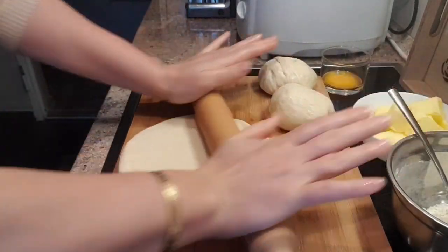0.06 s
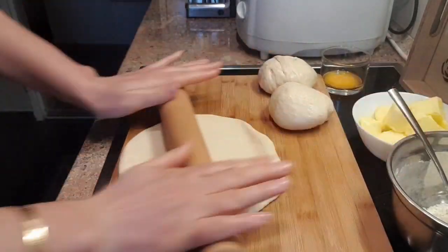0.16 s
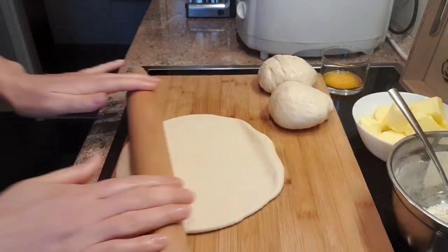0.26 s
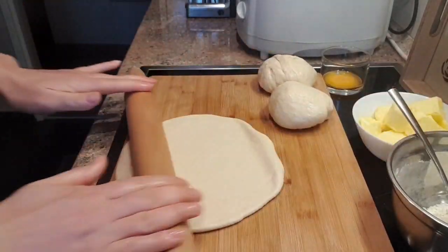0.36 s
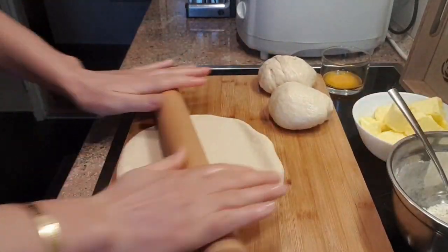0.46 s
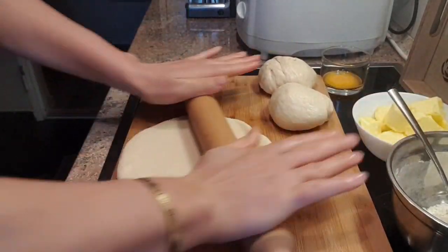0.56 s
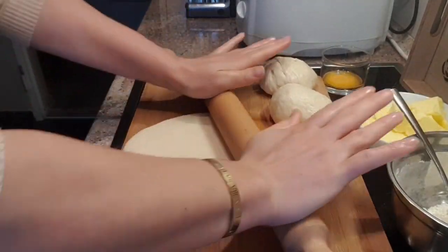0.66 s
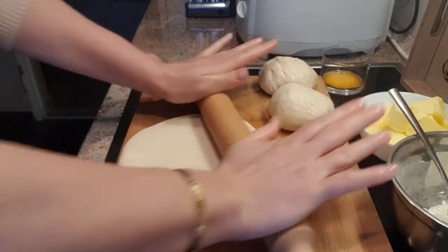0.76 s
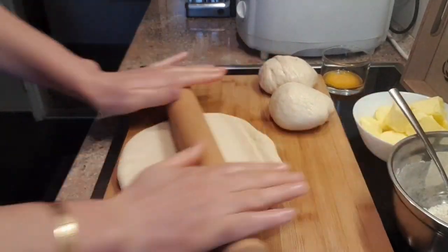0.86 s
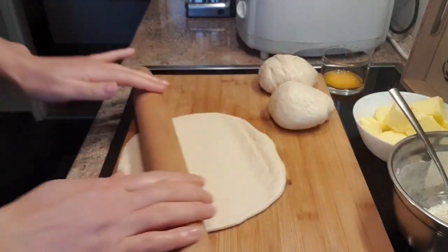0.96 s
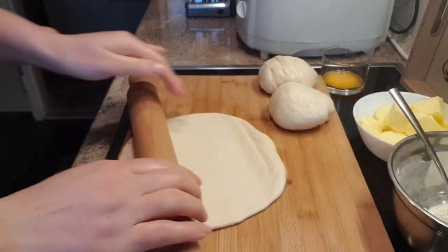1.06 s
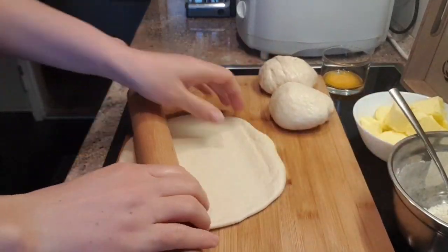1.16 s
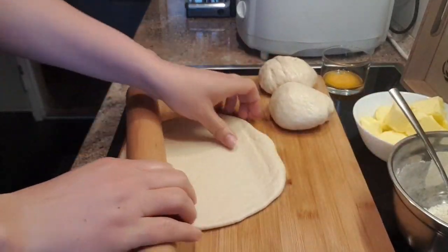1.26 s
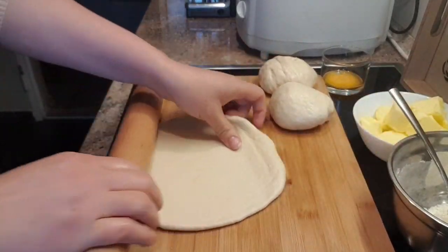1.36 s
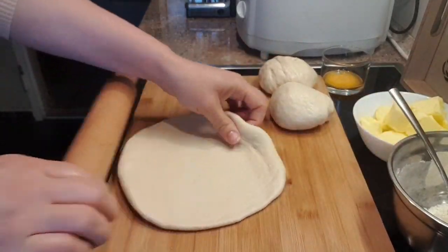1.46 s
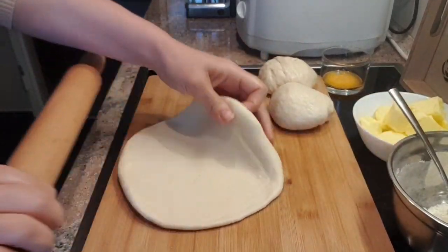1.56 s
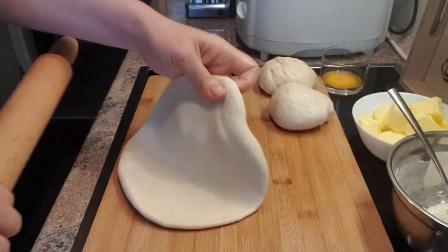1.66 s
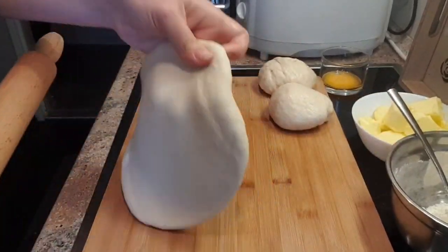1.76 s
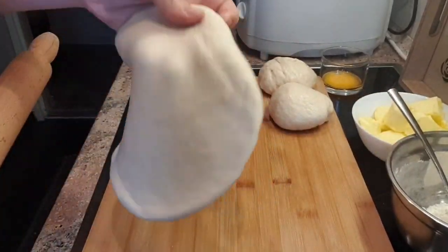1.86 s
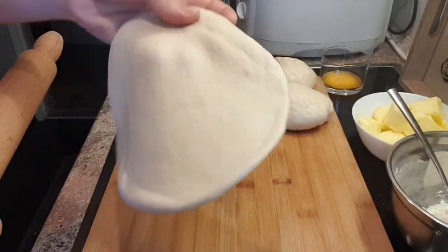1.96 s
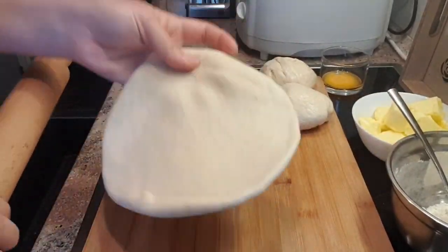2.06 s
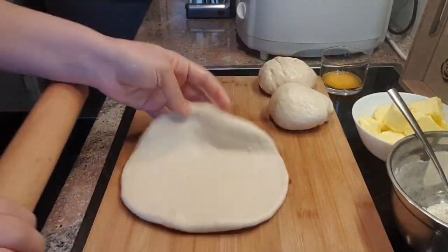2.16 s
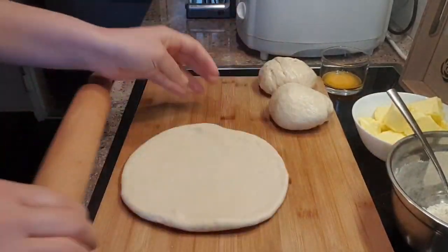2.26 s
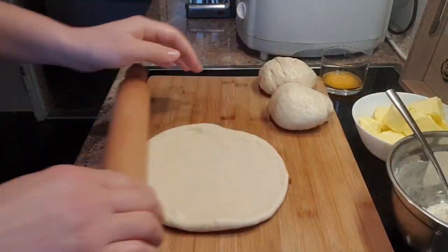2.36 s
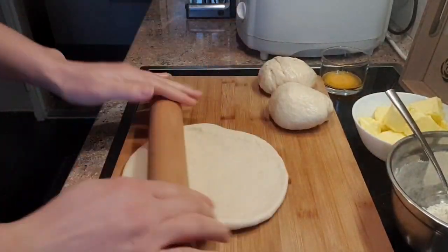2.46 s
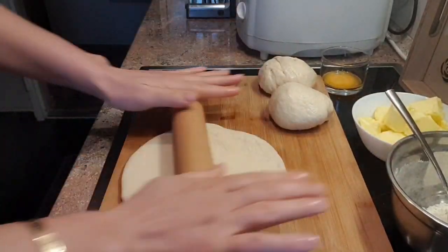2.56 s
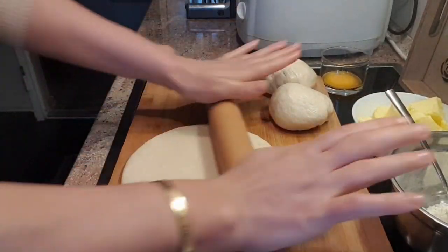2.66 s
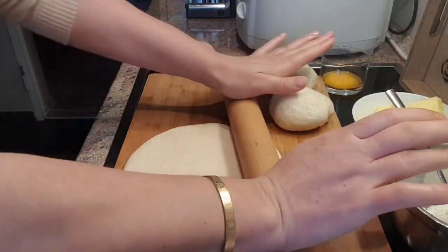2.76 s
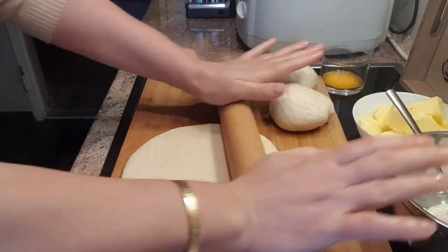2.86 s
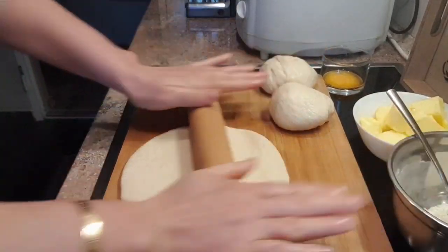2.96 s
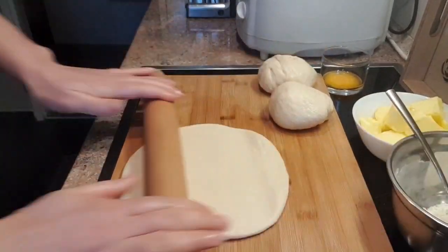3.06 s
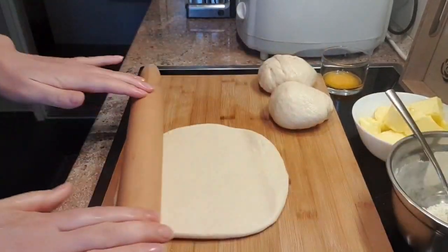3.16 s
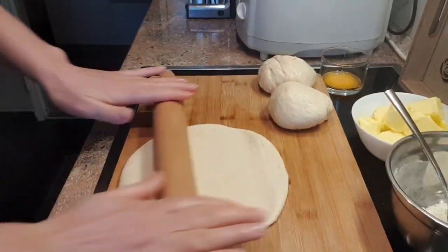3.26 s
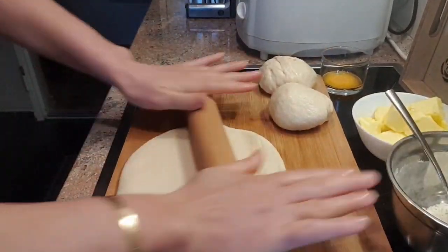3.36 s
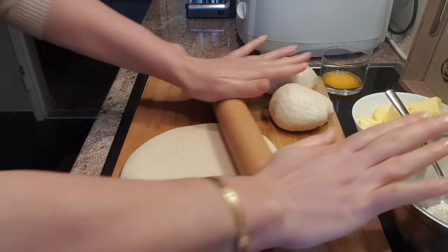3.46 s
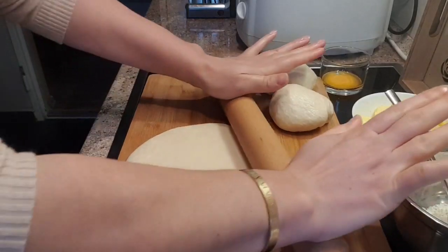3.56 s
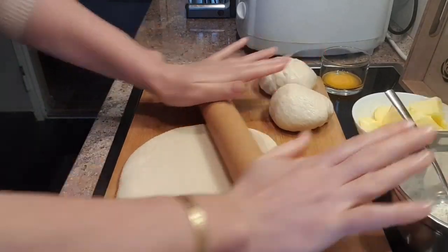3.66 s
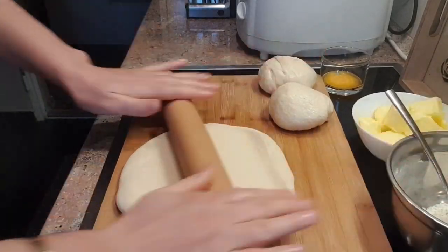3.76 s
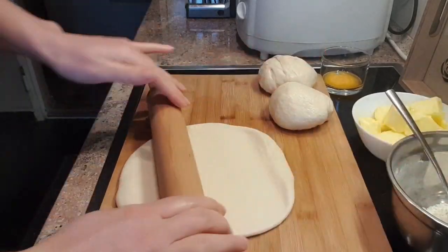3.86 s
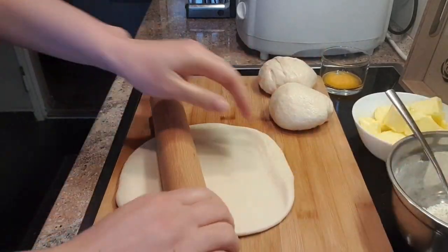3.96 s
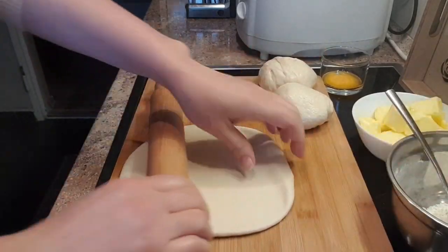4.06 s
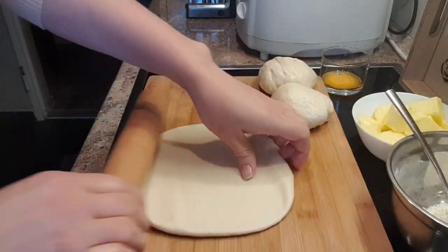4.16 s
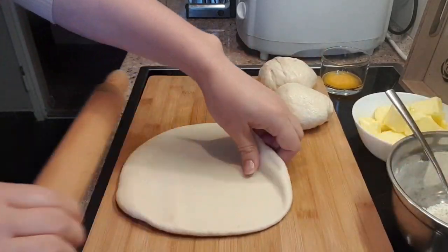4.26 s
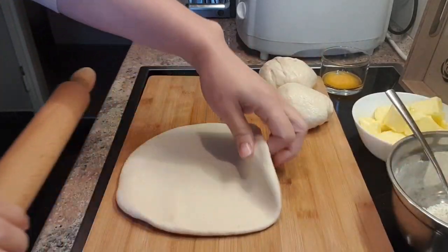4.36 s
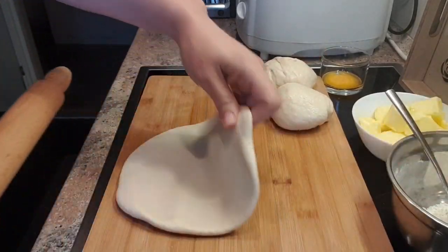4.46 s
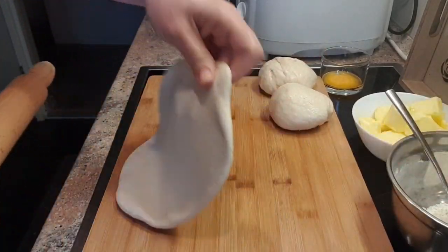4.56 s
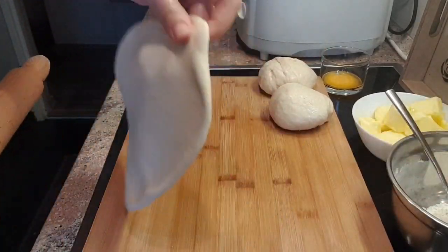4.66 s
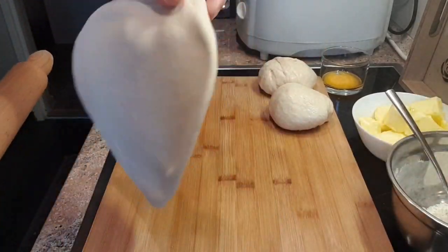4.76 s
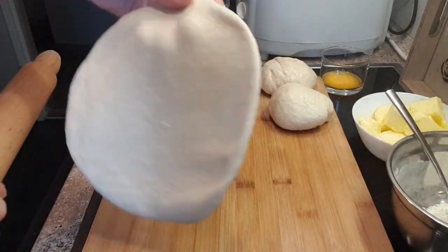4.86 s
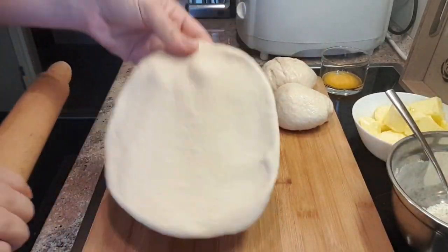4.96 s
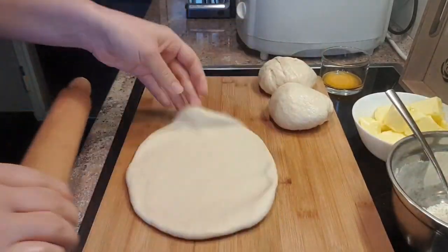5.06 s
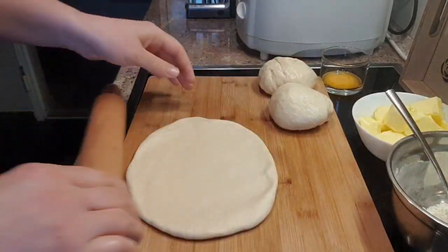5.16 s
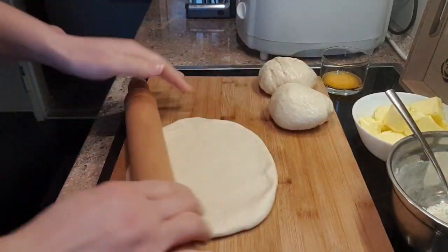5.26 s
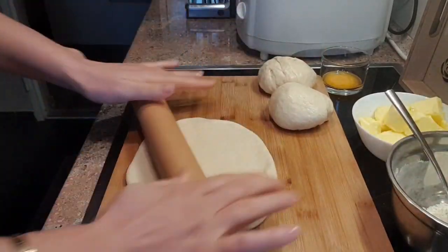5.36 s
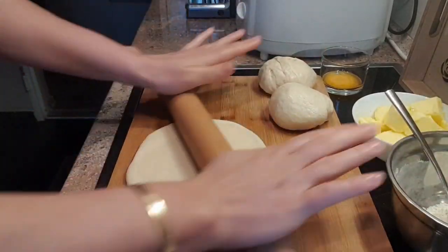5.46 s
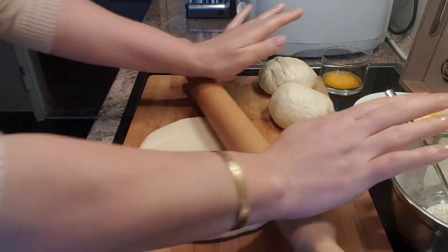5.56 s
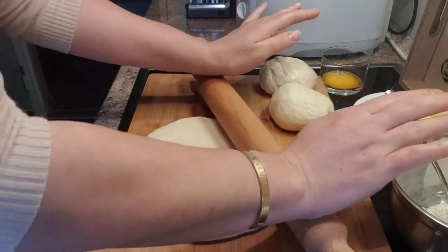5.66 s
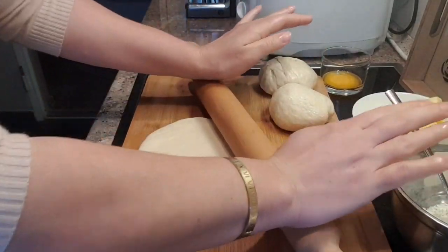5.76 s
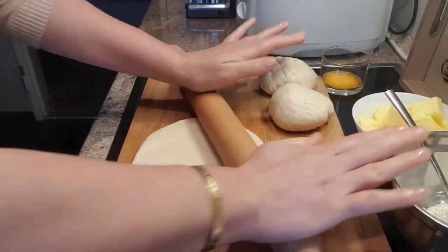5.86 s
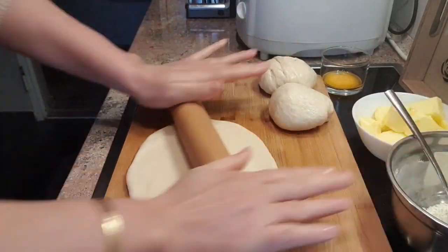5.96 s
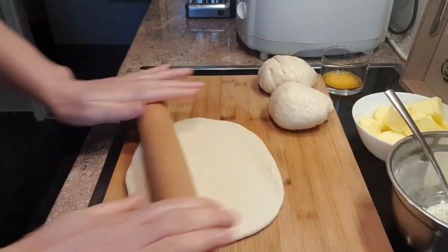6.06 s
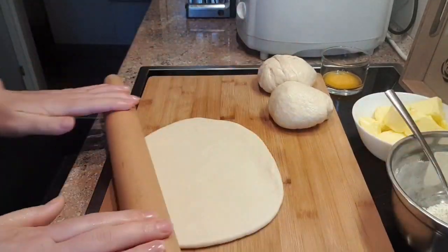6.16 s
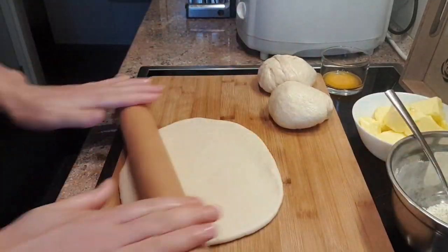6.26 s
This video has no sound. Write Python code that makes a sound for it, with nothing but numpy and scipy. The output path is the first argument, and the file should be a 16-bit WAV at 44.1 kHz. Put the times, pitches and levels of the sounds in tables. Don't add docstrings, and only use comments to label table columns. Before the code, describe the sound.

Close kitchen dough rolling: low rumbling strokes and floury swishes, one flat slap, a faint peel, a hard wooden drop with bounces, rolling again.

```python
import sys
import numpy as np
from scipy import signal
from scipy.fft import rfft, irfft
from scipy.io import wavfile
from scipy.ndimage import uniform_filter1d

SR = 44100
rng = np.random.default_rng(int(sys.argv[2]) if len(sys.argv) > 2 else 0)


def amplitude_ratio(level_db):
    exponent = np.asarray(level_db, float) / 20
    return 10 ** exponent


def to_wav(sig):
    pcm = np.clip(np.atleast_2d(sig), -1, 1) * 32767
    pcm = np.round(pcm).astype(np.int16)
    wavfile.write(sys.argv[1], SR, pcm.T)


N = 277389

# pitch_hz, t60_s
COUNTER = [(53, 0.53), (79, 0.3), (100, 0.09)]
# pitch_hz, likeness_0_to_1
SAME = [(60, 0.94), (250, 0.68), (600, 0.57), (1500, 0.083), (4000, 0.067), (12000, 0.073)]


def evened(x):
    return x / np.sqrt(np.mean(x ** 2) + 1e-20)


def read(points, hz):
    f, value = np.transpose(points)
    return np.interp(np.log(hz + 1), np.log(f + 1), value)


def add(mix, start_s, sound):
    part = mix[..., round(start_s * SR):][..., :sound.shape[-1]]
    part += sound[..., :part.shape[-1]]


def ring(hz, db, t60_s, rise_s):
    t = np.arange(SR // 2) / SR
    swell = (1 - np.exp(-t / rise_s)) ** 2
    return amplitude_ratio(db - 60 * t / t60_s) * swell * np.sin(2 * np.pi * hz * t)


def resonate(x, hz, width_hz):
    return signal.lfilter(*signal.iirpeak(hz, hz / width_hz, SR), x)


def causal(db):
    log_gain = np.log(amplitude_ratio(np.maximum(db, -90)))
    full = np.concatenate([log_gain, log_gain[-2:0:-1]])
    return np.fft.ifft(np.exp(np.conj(signal.hilbert(full)))).real


def swells(rows, end_db, blunt):
    t, power = np.arange(N) / SR, 0
    for peak_s, rise_s, fall_s, *db in rows:
        away = np.where(t < peak_s, (peak_s - t) / rise_s, (t - peak_s) / fall_s)
        level_db = np.array(db)[:, None] + end_db * np.minimum(away, 4) ** blunt
        power = power + amplitude_ratio(level_db) ** 2
    return np.sqrt(power)


def noise(shape, patchy_db, flicker_db, size=512):
    frames, hz = 4 * N // size + 5, np.fft.rfftfreq(size, 1 / SR)
    a, b, c, d, patches = rng.standard_normal((frames, len(hz), 5)).T
    flicker = evened(uniform_filter1d(rng.standard_normal(frames), size=3))
    patches = uniform_filter1d(patches, size=8, axis=0)
    patches = evened(uniform_filter1d(patches, size=16, axis=1))
    same = np.clip(read(SAME, hz), -1, 1)[:, None]
    left = a + 1j * b
    right = same * left + np.sqrt(1 - same ** 2) * (c + 1j * d)
    level_db = read(shape, hz)[:, None] + patchy_db * patches + flicker_db * flicker
    z = np.array([left, right]) * amplitude_ratio(level_db)
    return evened(signal.istft(z, nperseg=size, noverlap=3 * size // 4)[1][:, :N])


def still_air():
    # pitch_hz, level_db_per_hz
    murmur = [(15, -39), (25, -17.5), (60, -2.5), (96, 3), (161, 1.5), (256, -7), (335, -4.5), (439, -15.5),
              (1160, -19), (1440, -26.5), (2050, -25), (6050, -37.5), (7310, -41), (8830, -38),
              (14800, -34), (16000, -41)]
    # peak_s, rise_s, fall_s, share_taken_away_db
    lull = [
        (5.06, 0.37, 0.14, -13),
    ]
    # pitch_hz, level_db
    whine_hz, whine_db = (7250, -92.5)
    whine = amplitude_ratio(whine_db) * evened(resonate(rng.standard_normal((2, N)), whine_hz, 70))
    left_over = 1 - np.minimum(swells(lull, -5.5, 1.8), 0.8)
    return amplitude_ratio(-61) * left_over * noise(murmur, 0.44, 0.93, size=2048) + whine


def drone():
    # peak_s, rise_s, fall_s, level_db
    passing = [
        (2.2, 0.3, 0.24, -55),
    ]
    hz, width_hz = 63.9, 13
    hum = resonate(resonate(rng.standard_normal(N), hz, width_hz), hz, width_hz)
    return swells(passing, -16, 3.1)[0] * evened(hum)


def kitchen(x):
    # pitch_hz, t60_s
    decay = [(150, 0.69), (350, 0.26), (700, 0.39), (1500, 0.35), (4000, 0.33), (12000, 0.25)]
    taps = np.zeros((2, SR))
    at = np.arange(200, SR - 20, 20) + rng.integers(0, 20, (2, (SR - 201) // 20))
    np.put_along_axis(taps, at, rng.choice([-1., 1.], at.shape), 1)
    hz, t, z = signal.stft(taps, SR, nperseg=512)
    same = np.clip(read(SAME, hz), -1, 1)[:, None]
    z[1] = same * z[0] + np.sqrt(1 - same ** 2) * z[1]
    tail = signal.istft(z * amplitude_ratio(-60 * t / read(decay, hz)[:, None]), SR, nperseg=512)[1]
    return signal.fftconvolve(x[None], tail / np.linalg.norm(tail[0]), axes=1)[:, :N]


def counter():
    # start_s, level_db, spot (0 rings the low mode, 1 the middle, 2 the upper)
    lumps = [(0.009, -39.5, 1.57), (0.156, -32.5, 2.63), (0.185, -46.5, 1), (0.278, -36, 1.72),
             (0.334, -41, 0.44), (0.369, -52, 0.46), (0.415, -52, 1), (0.548, -46, 0.99),
             (0.612, -36.5, 1.22), (0.641, -55, 1), (0.67, -43, 1), (0.728, -46.5, 1), (0.775, -47.5, 1.2),
             (0.824, -54.5, 1), (0.978, -35, 1.48), (1.015, -42, 0.33), (1.059, -34.5, 1.9),
             (1.093, -49, 1), (1.353, -40, 0.99), (1.506, -53, 0.99), (1.72, -56, 1.6), (1.767, -41, 2.1),
             (3.155, -39.5, 0.48), (3.2, -47.5, 1), (3.413, -43.5, 1.03), (3.877, -37.5, 0.74),
             (3.928, -60, 0.9), (4.189, -51, 1.7), (4.302, -46, 1.35), (4.391, -52, 2), (4.849, -58.5, 1.9),
             (5.901, -30, 2.5), (6.188, -42.5, 1.2)]
    # start_s, low_mode_db, middle_mode_db, upper_mode_db
    jolts = [
        (5.193, -42.5, -60, -27),
        (5.237, -52.5, -46, -36),
        (5.399, -46.5, -56, -37.5),
        (5.6, -66, -57, -46.5),
        (2.95, -69, -56, -33),
    ]
    spot_db = -13
    arm_damp = 0.49
    shoves = [(s, 1, db) for s, *db in jolts]
    for s, db, spot in lumps:
        shoves.append((s, arm_damp, db + spot_db * abs(spot - np.arange(len(COUNTER)))))
    out = np.zeros(N)
    for s, share, mode_db in shoves:
        for (hz, t60_s), db in zip(COUNTER, mode_db):
            add(out, s, ring(hz, db + 8.5, share * t60_s, 0.0043))
    return out


def bodies():
    # pitch_hz, level_db, t60_s, starting_way
    UNDER_PRESS = [(54.2, -14, .22, 1), (76, -5.3, .13, 1), (97.5, -9.5, .089, 1), (140, -18, .048, 1)]
    UNDER_LEAN = [(54, -24, .31, 1), (79, -18, .23, 1), (100, -18, .082, 1), (133, -22, .06, 1)]
    UNDER_SLAP = [(52, -23, .29, 1), (80, -15, .135, 1), (101, -31, .24, 1), (218, -18, .052, 1),
                  (285, -19, .074, -1)]
    UNDER_EDGE = [(56, -42, .3, 1), (80, -27, .27, 1), (114, -16.5, .039, -1), (181, -41, .14, 1),
                  (221, -24.5, .115, 1), (337, -12, .017, -1)]
    UNDER_BANG = [(82, -23, .25, 1), (99, -21, .25, 1), (171, -30, .2, 1), (231, -14, .053, 1),
                  (290, -21, .2, -1), (368, -34, .2, -1), (631, -33, .03, 1), (740, -31, .08, 1),
                  (824, -29, .04, 1), (949, -30, .065, -1), (1057, -24, .037, 1), (205, -31, .1, 1)]
    UNDER_DROP = [(106, -28, .046, -1), (380, -42, .2, -1), (739, -22, .062, -1), (857, -12, .024, -1),
                  (927, -26, .07, 1), (1013, -17, .035, 1), (1516, -28, .024, 1), (1606, -43, .1, 1)]
    # pitch_hz, level_db, t60_s, starting_way
    SLAP_RING = [(441, -33, .157, 1), (512, -20, .037, -1), (639, -18, .035, -1), (745, -25, .064, -1),
                 (848, -22, .095, -1), (914, -18, .07, 1), (1091, -27, .147, 1), (1231, -28, .041, 1),
                 (1513, -21, .016, -1), (578, -25, .09, 1)]
    EDGE_RING = [(422, -36, .07, 1), (608, -45, .134, 1), (715, -40, .035, 1), (876, -46, .039, -1),
                 (958, -47, .058, -1)]
    PRESS_RING = [(205, -42, .15, 1), (316, -47, .15, -1), (370, -44, .08, 1), (427, -51, .15, 1),
                  (470, -44, .04, -1)]
    BOUNCE_RING = [(306, -23, .013, -1), (423, -27, .02, -1), (520, -33, .03, 1), (748, -33, .036, -1),
                   (862, -24, .022, -1), (1012, -25, .021, 1), (1333, -42, .1, 1), (1583, -34, .021, 1)]
    TOUCH_RING = [(834, -55, .075, 1), (1053, -47, .034, -1), (1250, -43, .006, -1), (1437, -54, .019, -1),
                  (1658, -60, .06, 1)]
    # start_s, what_rings, strength_and_way, rise_s, rise_in_turns_of_each_mode
    strikes = [(1.3494, TOUCH_RING, 1, 0, .02), (1.3651, TOUCH_RING, -.9, 0, .02),
               (1.408, TOUCH_RING, .4, 0, .3), (1.423, TOUCH_RING, -.75, 0, .2),
               (2.3074, SLAP_RING, 1, 0, .6), (2.3122, UNDER_SLAP, 1, .0068, 0),
               (2.592, UNDER_LEAN, -.3, 0, .5), (2.5978, UNDER_PRESS, 1, 0, .5),
               (2.6066, PRESS_RING, 1, 0, .6), (2.6493, PRESS_RING, .7, 0, .6),
               (2.9048, UNDER_EDGE, 1.25, .0053, 0), (2.907, EDGE_RING, 1, 0, .1),
               (5.1889, BOUNCE_RING, 1, 0, .6), (5.2008, BOUNCE_RING, -1.3, 0, .6),
               (5.2357, UNDER_DROP, 1.2, 0, .35), (5.3638, UNDER_BANG, 1, 0, .114),
               (5.4627, UNDER_LEAN, 1, 0, .39), (5.8337, UNDER_EDGE, 1, .0053, 0),
               (5.8359, EDGE_RING, .9, 0, .1)]
    # pitch_hz, difference_db
    apart = [(60, -40.5), (200, -14.5), (400, -13.5), (800, -11), (1500, -3.5)]
    out = np.zeros((2, N))
    for s, body, strength, rise_s, turns in strikes:
        for k, (hz, db, t60_s, way) in enumerate(body):
            mode = strength * way * ring(hz, db, t60_s, rise_s + turns / hz)
            quarter_turn = np.gradient(mode) * SR / (2 * np.pi * hz)
            ahead = (-1) ** k * amplitude_ratio(read(apart, hz)) * quarter_turn
            add(out, s, np.array([mode + ahead, mode - ahead]))
    return out


def knocks(rows, colour, rise_s, clatter_s, pin_db, click_db, room_db):
    # pitch_hz, level_db, t60_s
    pin = [(714.5, -4, 0.15), (848, -9.5, 0.099), (930, -7, 0.021), (930, -2, 0.07), (1025, -15.5, 0.13),
           (1076, -6.5, 0.35), (1305, -3, 0.037), (1500, -17.5, .07), (1648, -17.5, 0.04),
           (2110, -15, 0.061), (2430, -18.5, .1), (2750, -5, 0.08), (3000, -12.5, 0.04)]
    # pitch_hz, t60_s
    board = [(216, .085), (283, .1)]
    out, t = np.zeros((3, N)), np.arange(8192) / SR
    hz = np.fft.rfftfreq(len(t), 1 / SR)
    high = signal.butter(1, 900, "high", fs=SR)
    for s, body_db, *board_db, treble_db in rows:
        def shape(f):
            return read(colour, f) + treble_db * np.log2(f / 1000 + 0.00013) / 2
        click = causal(shape(hz))
        click = click / np.linalg.norm(click)
        grain = rng.standard_normal((2, len(t)))
        shared = grain.mean(0)
        apart = signal.lfilter(*high, grain - shared)
        dying = amplitude_ratio(-60 * t / clatter_s) * (1 - np.exp(-t / rise_s))
        grain = 1.52 * (shared + 0.97 * apart) * dying
        grain[:, 0] += amplitude_ratio(click_db)
        add(out[:2], s, amplitude_ratio(body_db - 6.0) * signal.fftconvolve(grain, click[None], axes=1))
        add(out[2], s, amplitude_ratio(body_db + room_db) * np.sqrt(1000 * clatter_s) * click)
        for f, db, t60_s in pin:
            mode_db = body_db + pin_db + db + shape(f) + 1.1 * rng.standard_normal()
            add(out[:2], s, ring(f, mode_db, t60_s, rise_s))
        for (f, t60_s), db in zip(board, board_db):
            add(out[:2], s, ring(f, db, t60_s, 2 * rise_s))
    return out


def ticks():
    # start_s, body_db, board_mode_1_db, board_mode_2_db, treble_db_per_two_octaves
    touches = [(1.349, -50, -47.5, -70, -4), (1.352, -40.5, -64, -70, -3), (1.3645, -50, -51, -46, -8.5),
               (1.409, -54, -66, -57, -10), (1.421, -57, -62, -53.5, -10), (1.428, -53, -60, -56, 8)]
    # pitch_hz, level_db_per_hz
    colour = [(260, -54), (450, -4), (694, -13), (875, -1), (1130, -12), (1510, -4), (1940, -10),
              (5000, -30), (6500, -63), (11000, -120)]
    return knocks(touches, colour, 0.0015, 0.02, pin_db=-37, click_db=12.6, room_db=-1.3)


def pats():
    # start_s, body_db, board_mode_1_db, board_mode_2_db, treble_db_per_two_octaves
    presses = [(2.590, -47, -57, -62, 12), (2.619, -46.5, -53, -50, 16.5), (2.65, -49.5, -37.5, -50, 0.5),
               (4.181, -48.5, -70, -64, -6), (5.458, -50, -57, -56, 3)]
    # pitch_hz, level_db_per_hz
    colour = [(180, -13.5), (300, 6), (458, -1), (547, -2.5), (962, -3), (1750, -17), (2620, -22),
              (5000, -57), (6500, -83), (11000, -120)]
    return knocks(presses, colour, 0.0031, 0.17, pin_db=-38, click_db=-11, room_db=0.3)


def peels():
    # start_s, body_db, board_mode_1_db, board_mode_2_db, treble_db_per_two_octaves
    snaps = [(4.265, -50, -54, -80, 2), (4.282, -55, -72, -80, 8), (4.299, -44, -72, -78, -8),
             (4.338, -53, -69, -65, 4), (4.343, -52, -54, -56, -3), (4.369, -54.5, -62, -61, 9),
             (4.382, -51, -73, -68, -3), (4.39, -49.5, -55, -55, -2)]
    # pitch_hz, level_db_per_hz
    colour = [(260, -38), (450, -12), (885, -4), (2050, -12.5), (2770, -7), (6340, -21), (9000, -39),
              (11700, -52), (19800, -120)]
    return knocks(snaps, colour, 0.0016, 0.036, pin_db=-30, click_db=14.0, room_db=-0.99)


def creak():
    # peak_s, rise_s, fall_s, level_db
    creaking = [
        (4.385, 0.04, 0.031, -60.5),
    ]
    # pitch_hz, width_hz, level_db
    hollow = [(1040, 140, -4), (1530, 230, 4), (2860, 370, -5), (3400, 600, -3)]
    drift = evened(uniform_filter1d(rng.standard_normal(N), size=300))
    turns = np.cumsum(290 * amplitude_ratio(4.0 * drift)) / SR
    slips = np.diff(np.floor(turns), prepend=0) * amplitude_ratio(4.0 * rng.standard_normal(N))
    rung = sum(amplitude_ratio(db) * resonate(resonate(slips, hz, wide), hz, 2 * wide) for hz, wide, db in hollow)
    return swells(creaking, -10, 1.7)[0] * evened(rung)


def thuds():
    # start_s, body_db, board_mode_1_db, board_mode_2_db, treble_db_per_two_octaves
    falls = [(.275, -62, -42, -77, 15), (.983, -52, -40.5, -58, -6), (2.9065, -34, -61, -65, -5),
             (2.925, -42, -62, -63, -5), (5.8355, -35.5, -61, -56, 5), (5.872, -47.5, -42, -46, 12),
             (6.227, -55, -39.5, -72.5, 19)]
    # pitch_hz, level_db_per_hz
    colour = [(180, -20.5), (300, -19), (450, -13), (700, -15.5), (1200, -21), (1700, -28.5), (2300, -33.5),
              (3000, -44), (3600, -63), (5800, -73), (9900, -120)]
    return knocks(falls, colour, 0.0013, 0.043, pin_db=-2.4, click_db=5.0, room_db=4.2)


def drops():
    # start_s, body_db, board_mode_1_db, board_mode_2_db, treble_db_per_two_octaves
    bounces = [
        (5.178, -49.5, -42, -45, -15.5),
        (5.19, -15, -28.5, -33, -16.5),
        (5.198, -35.5, -60.5, -60.5, 5),
        (5.2017, -24, -32.5, -56.5, 5.5),
        (5.2365, -18.5, -50, -43, -0.5),
        (5.274, -35, -55.5, -56.5, -7),
    ]
    # pitch_hz, level_db_per_hz
    colour = [(190, -38.5), (330, -27), (535, -23), (740, -22), (870, -9.5), (1150, -11), (1600, -20),
              (2070, -15.5), (2500, -21.5), (2950, -17.5), (3900, -27.5), (6400, -39), (12600, -36.5),
              (15500, -44.5)]
    return knocks(bounces, colour, 0.00074, 0.076, pin_db=-9.0, click_db=9.8, room_db=-0.34)


def bangs():
    # start_s, body_db, board_mode_1_db, board_mode_2_db, treble_db_per_two_octaves
    landings = [
        (5.3607, -43.5, -55, -53, 11.5),
        (5.3625, -15.5, -38, -40.5, -2.5),
        (5.396, -25.5, -34.5, -49, -15.5),
    ]
    # pitch_hz, level_db_per_hz
    colour = [(190, -33.5), (330, -10), (560, -22), (760, -19.5), (1280, -20.5), (2600, -27.5), (3450, -26),
              (4200, -35.5), (8000, -51), (14100, -70), (15500, -71)]
    return knocks(landings, colour, 0.00032, 0.047, pin_db=-32.5, click_db=22.3, room_db=-0.74)


def slaps():
    # start_s, body_db, board_mode_1_db, board_mode_2_db, treble_db_per_two_octaves
    parts = [
        (2.301, -31, -58, -34.5, -9.5),
        (2.3078, -11, -38.5, -47, -4),
        (2.3125, -15, -51.5, -44, 4.5),
        (2.324, -15.5, -44.5, -37.5, -17),
        (2.34, -34, -46, -54, -7.5),
    ]
    # pitch_hz, level_db_per_hz
    colour = [(190, -38), (330, -22), (520, -20.5), (880, -12), (1150, -11.5), (1600, -22.5), (2100, -23.5),
              (2800, -21.5), (5200, -25), (7300, -31), (11200, -28.5), (15500, -42.5)]
    return knocks(parts, colour, 0.00086, 0.023, pin_db=-8.5, click_db=13.0, room_db=0.2)


def brushing():
    # peak_s, rise_s, fall_s, fine_hiss_db, coarse_scrape_db
    brushes = [(0.0, .01, 0.0021, -67.5, -49), (0.17, 0.064, 0.062, -78, -76), (0.36, .16, 0.12, -62, -57),
               (0.67, 0.15, 0.16, -65, -60.5), (1.05, 0.13, 0.14, -61.5, -57.5),
               (1.41, 0.081, 0.072, -73.5, -73), (1.53, 0.12, 0.16, -66.5, -70),
               (1.86, 0.25, .11, -55.5, -58), (2.54, 0.047, 0.056, -67.5, -66),
               (2.605, 0.032, 0.029, -70, -59.5), (2.78, 0.2, 0.11, -66, -64.5),
               (3.19, 0.152, 0.13, -63, -62), (3.44, 0.082, 0.23, -66, -66),
               (3.9, 0.13, 0.19, -63.5, -63.5), (4.02, 0.043, 0.031, -69, -68),
               (4.18, 0.028, 0.052, -71, -70), (4.268, 0.0043, 0.017, -58, -72),
               (4.37, 0.11, 0.074, -64, -65), (4.7, 0.2, .11, -53.5, -56.5), (5.37, .006, 0.13, -66, -73),
               (5.64, 0.5, 0.093, -69, -67), (6.18, 0.15, 0.14, -61, -59.5)]
    # pitch_hz, level_db_per_hz
    fizz_shape = [(880, -45.5), (1500, -9.5), (1920, -5), (2490, -11), (2940, -7), (3590, -9), (5600, -7),
                  (11500, -2), (14900, -4), (16000, -31)]
    # level_at_both_ends_db, bluntness_of_top
    swell = (-13.5, 2.06)
    fine, coarse = swells(brushes, *swell)
    fizz = noise(fizz_shape, 2.2, 0.69)
    scrape = signal.sosfiltfilt(signal.butter(2, 6580, fs=SR, output="sos"), fizz)
    return fine * (fizz - scrape) + coarse * scrape


def rolling():
    # peak_s, rise_s, fall_s, rumble_db, rub_db
    loads = [(0.03, 0.27, 0.039, -38.5, -65.5), (0.35, 0.23, 0.33, -44.5, -63),
             (0.66, 0.21, 0.39, -48, -62.5), (1.04, 0.1, 0.27, -41.5, -63), (1.37, 0.039, 0.23, -45.5, -61),
             (1.74, 0.17, 0.14, -45.5, -68.5), (1.92, 0.11, 0.067, -57, -63.5), (1.2, 0.24, 0.16, -72, -68),
             (2.76, 0.44, 0.11, -39.5, -66.5), (3.19, 0.13, 0.99, -51.5, -67),
             (3.46, 0.059, 0.31, -50, -72), (3.9, 0.14, 0.35, -47, -70), (4.15, 0.08, 0.062, -69, -70),
             (4.35, 0.074, 0.082, -53, -59.5), (4.7, 0.14, 0.41, -70, -67.5),
             (4.87, 0.047, 0.085, -51.5, -97), (5.98, 0.3, 0.16, -48, -72), (6.24, 0.13, 0.078, -42, -65)]
    # level_at_both_ends_db, bluntness_of_top
    swell = (-20.5, 1.36)
    # rumble_db, rub_db
    rest_db = (-65.5, -84)
    # pitch_hz, level_db_per_hz
    rub_shape = [(210, -30), (350, -7.5), (537, -10), (941, -6), (1280, -13), (1980, -16.5), (2500, -22.5),
                 (4000, -26.5), (5200, -33), (8800, -120)]
    rumble, rub = swells(loads, *swell) + amplitude_ratio(rest_db)[:, None]
    lumps = rng.standard_normal(N) * (rng.random(N) < 300 / SR)
    low, board = np.zeros(N), np.zeros(N)
    for (hz, _), db in zip(COUNTER, (-3.5, 0, -3.5)):
        low += amplitude_ratio(db) * resonate(resonate(lumps, hz, 23.0), hz, 8.5)
    for hz, wide, db in [(163.8, 29, 5.5), (206.0, 22, 2.5), (304.0, 23, -2.0), (427, 120, -11.5)]:
        board += amplitude_ratio(db) * resonate(resonate(lumps, hz, wide), hz, 3 * wide)
    shaken = rumble * (amplitude_ratio(-7.0) * evened(low) + amplitude_ratio(-15.5) * evened(board))
    return shaken + rub * noise(rub_shape, 0.65, 2.1)


def scene():
    blows = ticks() + pats() + peels() + thuds() + drops() + bangs() + slaps()
    rung = bodies()
    radiated = signal.lfilter(*signal.butter(2, 336, "high", fs=SR), rung.mean(0))
    walls = amplitude_ratio(-2.5) * kitchen(blows[2] + amplitude_ratio(-6) * radiated)
    background = still_air() + drone() + walls
    return background + counter() + rung + creak() + blows[:2] + brushing() + rolling()


def top_cut(x):
    return signal.sosfilt(signal.butter(12, 16490, fs=SR, output="sos"), x)


def record(dry):
    # pitch_hz, left_minus_right_db
    balance = [(60, 3.5), (240, -0.5), (950, -0.5), (3770, 1.5), (15000, 2.5)]
    port_gap, edge_hz = 4, 15560
    hz = np.fft.rfftfreq(N, 1 / SR)
    lean = read(balance, hz) / 2
    late = np.exp(-2j * np.pi * np.outer([0, port_gap], hz) / SR)
    x = irfft(rfft(dry) * amplitude_ratio([lean, -lean]) * late * (hz < edge_hz), N)
    x = signal.sosfilt(signal.butter(3, 37, "high", fs=SR, output="sos"), x)
    return top_cut(x)


dry = scene()
out = record(dry)
to_wav(out)
```